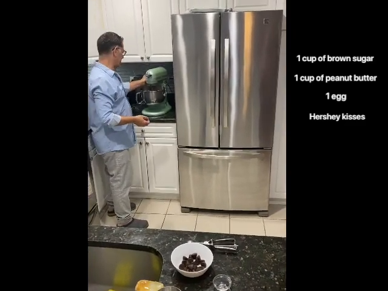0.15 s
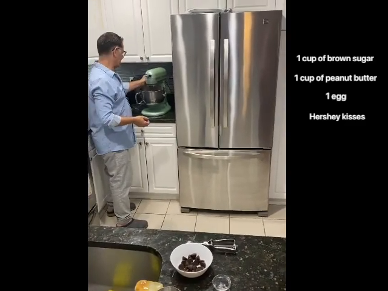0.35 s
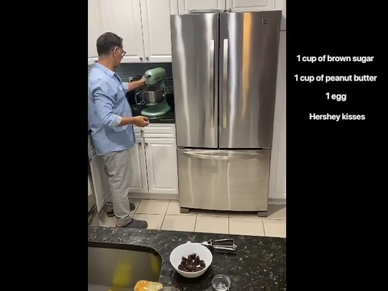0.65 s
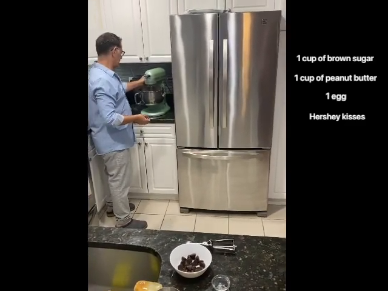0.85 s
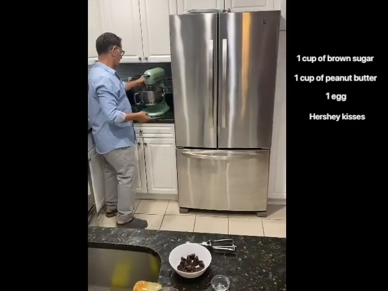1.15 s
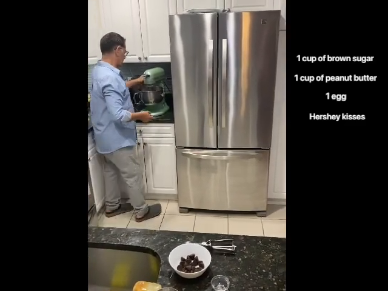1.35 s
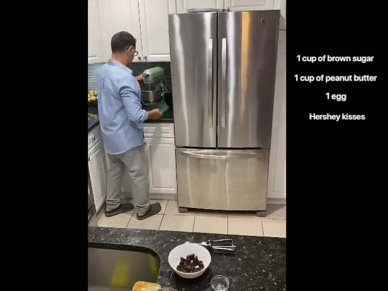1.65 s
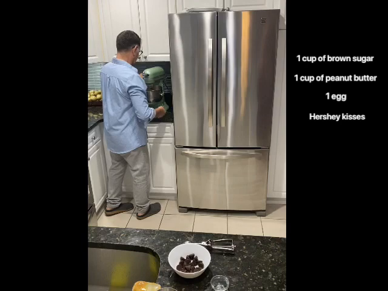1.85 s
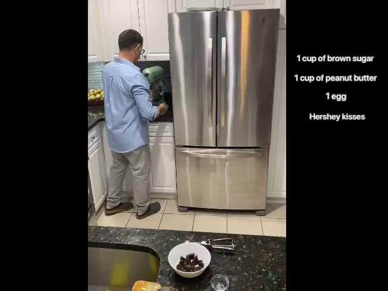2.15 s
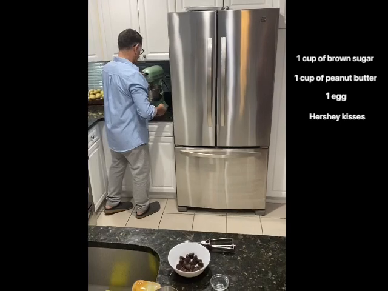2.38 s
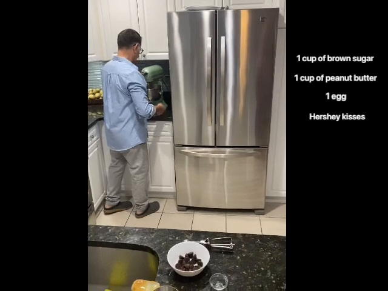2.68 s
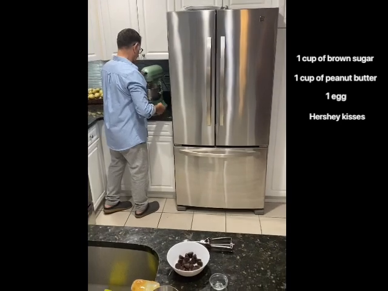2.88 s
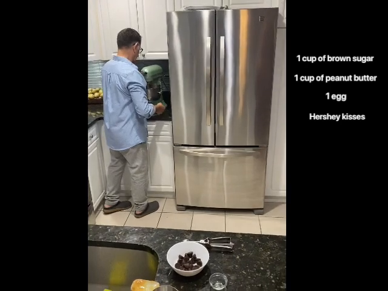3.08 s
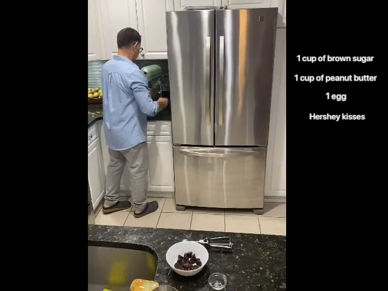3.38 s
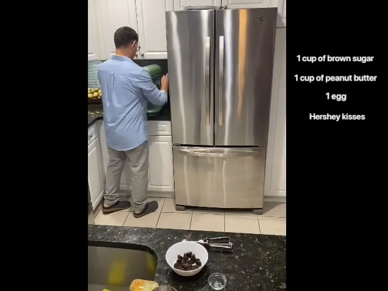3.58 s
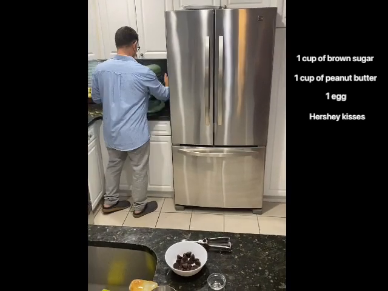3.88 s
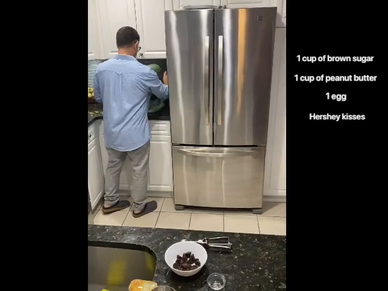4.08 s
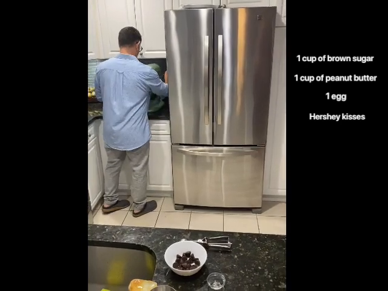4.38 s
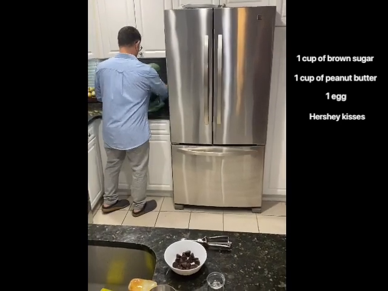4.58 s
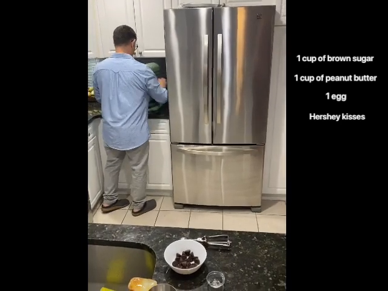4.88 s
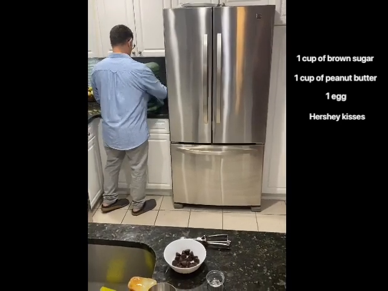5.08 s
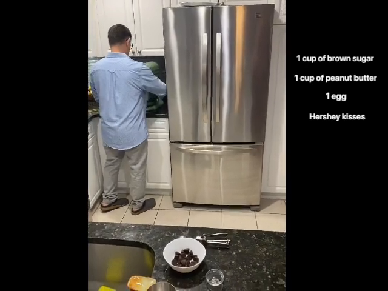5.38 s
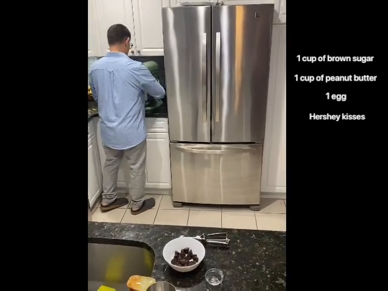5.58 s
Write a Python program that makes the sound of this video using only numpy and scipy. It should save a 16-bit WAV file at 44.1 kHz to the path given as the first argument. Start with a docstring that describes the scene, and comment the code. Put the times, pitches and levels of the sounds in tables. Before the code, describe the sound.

A stand mixer whines through thick dough, clicks off and winds down, then its head and steel bowl clank.

```python
"""A gear whine over hissing brushes and churning dough: a stand mixer at work in a tiled kitchen.
The speed lever snaps off; drag and friction slow the motor, and the slack gears glide down
through the resonances of the housing. Then the head and the steel bowl are handled: dull thumps,
clanks, rubbing and a short squeak. Two microphone ports hear it from a few metres away."""
import sys
import numpy as np
from scipy import signal
from scipy.fft import rfft, irfft, next_fast_len
from scipy.io import wavfile
from scipy.ndimage import map_coordinates

SR = 44100
rng = np.random.default_rng(int(sys.argv[2]) if len(sys.argv) > 2 else 0)


def digitize_waveform(pressure):
    """Quantize a signal to 16-bit integers and store it at the path in sys.argv[1].

    Rows of a 2-D input are taken as channels; values are limited to [-1, 1].
    """
    field = np.atleast_2d(pressure).T
    bounded = np.clip(field, -1, 1)
    quanta = np.round(bounded * 32767).astype(np.int16)
    wavfile.write(sys.argv[1], SR, quanta)


N = 252693
TIME = np.arange(N) / SR
SPLIT = np.array([[.5], [-.5]])  # shares a left-minus-right difference between the ports
MESH_HZ = 2375  # pitch of the meshing teeth at full speed


def mixer():
    """The motor's speed pulls the gear pitches along; hiss, churning and tones fade as it slows."""
    speed = motor_speed()
    travel = 2 * np.pi * np.cumsum(speed) / SR  # phase of a tone that is 1 Hz at full speed
    mesh_phase = MESH_HZ * travel
    slack = np.clip((.99 - speed) / .12, 0, 1)  # without power the teeth run slack
    stall_fade = np.clip(speed * MESH_HZ / 535, 0, 1) ** 1.45  # dies fast below a 535 Hz mesh pitch
    bed = brushes(speed, mesh_phase) + dough(speed) + running_tones(speed, slack)
    whine, whine_level = gear_whine(travel, slack)
    rattle, slack_level = slack_gears(speed, slack, mesh_phase)
    echo_send = (slack_level + amp(-18) * whine_level.mean(axis=0)) * np.sin(mesh_phase)
    echo = kitchen(echo_send, direct_db=-5.5)[:, :N]
    singing = kitchen(amp(-33) * housing(rattle), direct_db=3)[:, :N]
    return stall_fade * bed + whine + echo + singing


def motor_speed(off_s=3.239, drag_s=.8, friction_hz_per_s=1100):
    """Share of full speed: it settles, wavers in the dough, then drag and friction bring it to rest."""
    powered = 1 - .014 * np.exp(-TIME / .13) + 0.00266 * wobble(22)
    friction = friction_hz_per_s * drag_s / MESH_HZ
    coasting = (1 + friction) * np.exp(-np.maximum(TIME - off_s, 0) / drag_s) - friction
    return powered * np.maximum(coasting, 0)


# fader ride on the whine, shaded as the cook steps in front: t/s, level/dB, left minus right/dB
WHINE_RIDE = [(0.0, -31.5, -3.5), (0.04, -20.5, 1), (0.8, -21.5, 1), (0.9, -22, 1), (1.22, -21.5, 2),
              (1.28, -19.5, 1.5), (1.4, -21.5, 4), (1.55, -24.5, 2), (1.65, -28.5, 0), (1.7, -27.5, 0),
              (1.78, -26, 1), (1.92, -30.5, -3), (1.97, -26, -1), (2.07, -29.5, 1), (2.16, -31, 5),
              (2.28, -25, -7), (2.41, -31.5, -2.5), (2.5, -29.5, -11), (2.54, -20, 3), (2.63, -24.5, -9),
              (2.68, -28, -7), (2.84, -21.5, -1), (2.91, -30.5, -5), (3.03, -24, -2.5), (3.13, -28.5, -7),
              (3.22, -30, -2)]
# brief dips, often deeper at one port: t/s, left depth/dB, right depth/dB, half length/s
WHINE_DIPS = [(0.115, 20, 14, 0.012), (0.22, 0.5, 9, 0.0075), (0.301, 2, 1.5, 0.011),
              (.385, 1, 2.5, 0.0083), (0.483, 5, 21, 0.0057), (0.531, 12, 12.5, 0.015),
              (0.646, 7.5, 8.5, 0.014), (0.696, 8.5, 9, 0.01), (0.913, -1, 1.5, 0.018),
              (1.03, 14, 10, 0.016), (1.146, 0.5, 3, 0.0059), (1.45, -1, 3.5, 0.0071),
              (1.648, -3, 6.5, 0.018), (1.843, 9, 16, 0.0076), (1.916, 14, 6, 0.0072),
              (2.087, 20, 4, 0.0086), (2.156, -3, 11, .014), (2.356, 20, 3, .011), (2.674, 7, 2, .016),
              (2.89, 3, 1.5, 0.011), (2.95, 7, 8, 0.0093), (3.09, 7, 2.5, 0.014)]
# tremolo from the turning beater and shafts: f/Hz at full speed, depth/dB
SHAFT_TREMOLO = [(9.9, 0.35), (19.8, 1.0), (39.5, 0.84)]


def gear_whine(travel, slack, left_lead_rad=1.74, slip_rad_per_db=0.2):
    """Meshing teeth sing one tone that flutters with the load; returns the tone and its envelope."""
    ride_db, shadow_db = curves(WHINE_RIDE)
    tremolo_db = sum(depth * np.sin(hz * travel + 2 * np.pi * rng.random())
                     for hz, depth in SHAFT_TREMOLO)
    flutter_db = 1.15 * (wobble(60) + np.array([wobble(35), wobble(35.16)]))
    waver_rad = 0.27 * (wobble(30.22) + .5 * np.array([wobble(40.23), wobble(40)]))
    dip_db = sum(np.outer([left_db, right_db], np.exp(-((TIME - s) / half_length) ** 2))
                 for s, left_db, right_db, half_length in WHINE_DIPS)
    envelope = (1 - slack) * amp(ride_db - dip_db - 0.43)
    phase = MESH_HZ * travel + SPLIT * left_lead_rad + waver_rad - slip_rad_per_db * dip_db
    return envelope * amp(tremolo_db + flutter_db + SPLIT * shadow_db) * np.sin(phase), envelope


# bright hiss of brushes and fan: f/Hz, level/dB
BRUSH_COLOUR = [(1200, -14), (1900, -13.5), (2500, -1), (3100, -3.5), (3800, -5.5), (4500, -0.5), (5800, 0),
                (6400, -3.5), (7100, -5), (7800, -7), (10000, -6.5), (11000, -7.5), (11900, -110)]


def brushes(speed, mesh_phase, teeth=20):
    """The brushes hiss unevenly and scrape harder once a turn."""
    scrape = (1 + 0.067 * np.sin(mesh_phase / teeth)) * amp(1.06 * wobble(22.25))
    return amp(-32.5) * speed * scrape * noise(BRUSH_COLOUR)


# midrange churn of thick dough: f/Hz, level/dB
DOUGH_COLOUR = [(100, -13.5), (180, -7.5), (260, -1), (430, 3), (550, -6), (680, 7), (780, -1), (870, 7),
                (980, -3.5), (1200, 5), (1700, -5.5), (2300, 3), (4000, -17.5), (11000, -29), (12000, -110)]


def dough(speed, sag_db_per_s=1.06):
    """The beater drags through the dough; the churning eases as it softens."""
    level_db = -39 - sag_db_per_s * TIME + 1.86 * wobble(24.6)
    return amp(level_db) * speed ** 0.65 * noise(DOUGH_COLOUR)


# low partials of the gear train at full speed: f/Hz, level/dB
GEAR_PARTIALS = [(306.5, -51.5), (360.5, -55), (419.5, -58), (452, -63), (651.4, -49), (710, -63),
                 (834, -57), (872.1, -54), (920, -62.5), (1071, -50.5), (1168, -57.5), (1206, -49.5),
                 (1233, -48), (1427, -50), (1464, -55.5), (1545, -57.5), (1900, -71), (2137, -61.5)]
# high partials of the armature at full speed: f/Hz, level/dB
ARMATURE_PARTIALS = [(2612, -64), (2681, -66), (2849, -49.5), (2972, -59), (3086, -53.5), (3293, -54),
                     (3437, -57.5), (3560, -55), (4037, -52.5), (4165, -54), (4276, -50), (4512, -53.5),
                     (4710, -54), (4985, -45), (5342, -51), (5463, -49.5), (5582, -53), (5698, -53),
                     (5952, -47.5), (6070, -46), (6644, -56), (6998, -59.5), (7117, -49), (8545, -54)]
# the whine's octave swells as the cook turns: t/s, level/dB
OCTAVE_RIDE = [(0, -55), (.35, -39), (1.2, -49), (1.7, -43), (2.0, -32), (2.3, -45.5), (2.55, -33),
               (2.75, -41), (3.2, -40.5)]


def running_tones(speed, slack):
    """Gear train, armature and the whine's octave hum under load and sink away as the teeth go slack."""
    octave_db, = curves(OCTAVE_RIDE)
    gears = tones(GEAR_PARTIALS, speed, smear=0.57, waver_hz=14)
    armature = amp(3) * tones(ARMATURE_PARTIALS, speed, smear=1.94, waver_hz=30)
    octave = amp(octave_db) * tones([(2 * MESH_HZ, 0)], speed, smear=1.0, waver_hz=59)
    return amp(-16 * slack) * speed * (gears + armature + octave)


# falling tones of the slack gears: multiple of the mesh pitch, level/dB
SLACK_PARTIALS = [(.465, -1), (.53, -2), (.6, -9.5), (.96, -1), (1.2, -16.5), (1.45, -11)]
# dark chatter of loose teeth: f/Hz, level/dB
CHATTER_COLOUR = [(300, 5.5), (660, -2), (900, -17), (2500, -21), (5000, -40)]


def slack_gears(speed, slack, mesh_phase, grip_hz=343, fade_range_hz=131):
    """Loose teeth strike unevenly until they grip; returns their rattle and the mesh tone's envelope."""
    loose = slack * np.clip((speed * MESH_HZ - grip_hz) / fade_range_hz, 0, 1)
    glides = sum(amp(db + 3 * wobble(70)) * np.sin(multiple * mesh_phase)
                 for multiple, db in SLACK_PARTIALS)
    chatter = amp(1.5) * np.sqrt(speed) * unit(equalised(rng.standard_normal(N), CHATTER_COLOUR))
    return loose * (glides + chatter), amp(-48.5) * speed ** 1.4 * loose


# resonances of the cast housing: f/Hz, width/Hz, level/dB
HOUSING_MODES = [(402, 30, -9), (653.3, 34, 4), (856, 44, -1), (1073, 70, -9.5), (1194, 60, -8),
                 (1470, 190, -4.5), (2130, 240, -0.5)]


def housing(drive):
    """The housing sings whenever a falling gear tone crosses one of its steep-sided resonances."""
    def response(f):
        return sum(amp(db) * (1j * f * width / (hz * hz - f * f + 1j * f * width)) ** 2
                   for hz, width, db in HOUSING_MODES)
    return filtered(drive, response)


# cues for the speed lever: t/s, level/dB, knock/dB, clang/dB, bite/dB
SWITCH_HITS = [(3.2105, -13, -19, -22, -3.5), (3.2145, -10, -16, -21.5, -1)]
# its short, bright ring: f/Hz, level/dB, t60/s
SWITCH_MODES = [(3287, -1, 0.055), (4400, 4.5, 0.036), (5840, -12.5, 0.021)]


def speed_lever():
    """The lever snaps to off with a tight double click."""
    return contacts(SWITCH_HITS, SWITCH_MODES, ring_db=-11.5, crack_db=18.5, body_db=-2,
                    rattle_s=0.021, direct_db=5, top_hz=11300)


# cues for the head: t/s, level/dB, knock/dB, clang/dB, bite/dB
HEAD_HITS = [(4.364, -24.5, -8, -8.5, 6), (4.3829, -28.5, 0.5, -0.5, -2), (4.6149, -10, -11, -9, -1),
             (4.6187, -10.5, -17.5, -5.5, -6.5), (4.6507, -29, 9.5, -27, 1), (4.7076, -33.5, 1.5, 5.5, -5),
             (5.5689, -20.5, -10.5, -13, -9.5), (5.5851, -32.5, 4, -9, -3.5), (5.619, -39.5, 5.5, 1, -10),
             (5.7214, -39.5, -11, -19, 7)]
# its full-bodied ring: f/Hz, level/dB, t60/s
HEAD_MODES = [(150, -14.5, 0.2503), (435, -4, 0.27), (490, -9, 0.15), (645.8, -1, 0.31), (860, -0.5, 0.12),
              (1018, -1.5, 0.17), (1111, 5.5, 0.14), (1540, -1.5, 0.13), (1850, -28, 0.16),
              (2360, 4.5, 0.051), (2610, 7.5, 0.054), (4120, 1.5, 0.08), (4730, -9.5, 0.052),
              (5800, -15.5, 0.066), (5950, -5.5, 0.065)]


def mixer_head():
    """The heavy head knocks against its stops."""
    return contacts(HEAD_HITS, HEAD_MODES, ring_db=-12.5, crack_db=14, body_db=6.5,
                    rattle_s=0.055, direct_db=2.5, top_hz=14000)


# cues for the bowl: t/s, level/dB, knock/dB, clang/dB, bite/dB
BOWL_HITS = [(5.1896, -16, -26, -10.5, -2.5), (5.1964, -22, -6, -6.5, 0), (5.2234, -34, -1, -0.5, -5),
             (5.3622, -44.5, -14, 0, 12.5)]
# its short steel ring: f/Hz, level/dB, t60/s
BOWL_MODES = [(777, 13.5, 0.049), (851, 11.5, 0.087), (950, 4, 0.033), (1233, 2, 0.12), (1487, 8, 0.12),
              (3520, -13, 0.054), (4630, -8, 0.071), (5730, -17, 0.085), (8260, -21, 0.22)]


def steel_bowl():
    """The beater clanks against the bowl."""
    return contacts(BOWL_HITS, BOWL_MODES, ring_db=-5, crack_db=17, body_db=-10,
                    rattle_s=0.045, direct_db=5, top_hz=11900)


# cues for the lock: t/s, level/dB, knock/dB, clang/dB, bite/dB
LOCK_HITS = [(4.4047, -18.5, 0, -17, 0), (4.4121, -16, -6, -21, 4.5)]
# its crisp ring: f/Hz, level/dB, t60/s
LOCK_MODES = [(433, -12, .13), (2390, 4.5, 0.037), (2630, 2, 0.035), (2970, 0, 0.052), (3270, 0.5, 0.046),
              (4250, 2, 0.082), (6090, -2, 0.094), (7640, -7, 0.1), (9000, -9, .05), (9900, -4.5, 0.054)]


def lock():
    """The lock snaps over in two quick contacts."""
    return contacts(LOCK_HITS, LOCK_MODES, ring_db=-11.5, crack_db=18, body_db=-7.5,
                    rattle_s=0.029, direct_db=6.5, top_hz=11100)


# cues for the levers: t/s, level/dB, knock/dB, clang/dB, bite/dB
LEVER_HITS = [(4.0205, -41.5, -11, 4, -7), (4.354, -35, -12, -8, 2), (4.9585, -31.5, -4, -3.5, -3),
              (5.0459, -42.5, 0, -3, -5)]
# their thin ring: f/Hz, level/dB, t60/s
LEVER_MODES = [(860, 0, 0.22), (1040, -5, 0.23), (1997, 1.5, 0.076), (2490, 5, 0.035), (4180, -4, .08),
               (5330, -6, .07)]


def lever_ticks():
    """The levers tick lightly as they are handled."""
    return contacts(LEVER_HITS, LEVER_MODES, ring_db=-10.5, crack_db=15, body_db=-11.5,
                    rattle_s=0.054, direct_db=2, top_hz=11300)


# noise of metal on metal, struck or rubbed: f/Hz, level/dB
CONTACT_COLOUR = [(40, -6), (150, -10), (200, -12), (260, -0.5), (340, -8), (430, 5.5), (600, -3.5),
                  (1100, 2.5), (1900, -6), (2600, -11.5), (4200, -6.5), (6000, -16), (8000, -19),
                  (10000, -21), (11500, -19), (12500, -30), (16000, -38)]


def contacts(hits, modes, ring_db, crack_db, body_db, rattle_s, direct_db, top_hz):
    """Each hit cracks for a moment and rings its part's modes at new strengths; the kitchen answers."""
    out, t = np.zeros((2, N)), np.arange(SR // 4) / SR
    for s, db, knock_db, clang_db, bite_db in hits:
        ring = np.zeros(len(t))
        for hz, mode_db, t60 in modes:
            struck_db = mode_db + rng.normal(0, 1.5)
            ring += amp(struck_db - 60 * t / t60) * np.sin(2 * np.pi * (hz * t + rng.random()))
        ring *= 1 - np.exp(-t / 0.00056)
        burst = rng.standard_normal(len(t)) * amp(-60 * t / rattle_s) * (1 - np.exp(-t / 0.0033))
        crack = filtered(burst, lambda hz: amp(along(CONTACT_COLOUR, hz)) * below(top_hz, hz))
        # a heavy part answers more strongly in its low range
        low_db, mid_db = knock_db + body_db, clang_db + body_db / 2
        eq = [(250, low_db), (550, low_db), (850, mid_db), (1500, mid_db),
              (2300, bite_db), (3200, bite_db), (5000, 0)]
        blow = equalised(amp(ring_db) * ring + amp(crack_db) * crack, eq)
        add(out, s, amp(db) * kitchen(blow, direct_db))
    return out


# soft bumps on the counter: t/s, level/dB, f/Hz
COUNTER_BUMPS = [(4.032, -33.5, 51.6), (4.08, -28.5, 56), (4.626, -29.5, 68.5), (4.634, -37.5, 133)]


def counter_thumps(attack_s=0.0079, t60=0.28):
    """The counter booms briefly under the machine's weight."""
    out, t = np.zeros(N), np.arange(SR // 2) / SR
    for s, db, hz in COUNTER_BUMPS:
        envelope = amp(db - 60 * t / t60) * (1 - np.exp(-t / attack_s))
        add(out, s, envelope * np.sin(2 * np.pi * hz * t))
    return out


# strokes of metal sliding on metal: t/s, length/s, level/dB
RUB_STROKES = [(4.3, 0.045, -56.5), (4.349, 0.015, -41.5), (4.51, 0.26, -44), (5.169, 0.031, -42),
               (5.347, 0.034, -47), (5.42, 0.04, -64.5), (5.63, 0.12, -53)]


def rubbing(attack_s=0.022, release_db_per_s=116, top_hz=10000):
    """Sliding metal rasps unevenly."""
    strokes = np.zeros(N)
    for s, length, db in RUB_STROKES:
        attack = np.clip((TIME - s) / attack_s, 0, 1)
        strokes += attack * amp(db - release_db_per_s * np.maximum(TIME - s - length, 0))
    grain = amp(1.5 * wobble(27.04))
    return strokes * grain * filtered(noise(CONTACT_COLOUR), lambda hz: below(top_hz, hz))


def squeak(start_s=4.558, length_s=0.07, pitch_hz=3660, scatter_hz=49.4):
    """Slipping metal squeaks at a wavering pitch, leading into the loudest clank."""
    swell = np.sin(np.pi * np.clip((TIME - start_s) / length_s, 0, 1))
    hz = pitch_hz + scatter_hz * wobble(400)
    return amp(-43.5) * swell * np.sin(2 * np.pi * np.cumsum(hz) / SR)


# low bed of room tone: f/Hz, level/dB
ROOM_COLOUR = [(20, -43), (40, -20), (60, 7.5), (80, 1), (110, -0.5), (150, -9), (200, -12.5), (430, -10),
               (900, -23.5), (1600, -42), (5000, -45), (11000, -65), (12500, -110)]


def room_tone():
    """The room rumbles faintly under everything."""
    return amp(-51.5) * noise(ROOM_COLOUR)


# reverb time of the tiled kitchen: f/Hz, t60/s
KITCHEN_DECAY = [(100, 0.23), (500, 0.51), (2000, 0.41), (5000, 0.36), (9000, 0.29), (12500, 0.049)]


def kitchen(sound, direct_db):
    """A mono sound reaches the ports directly, then as a tail that dies by frequency."""
    hz, t, bands = signal.stft(rng.standard_normal((2, SR // 2)), SR, nperseg=256)
    decay = amp(-60 * t / along(KITCHEN_DECAY, hz)[:, None])
    impulse = signal.istft(bands * decay, SR, nperseg=256)[1]
    impulse /= np.linalg.norm(impulse[0])
    impulse[0, 16] += amp(direct_db)
    path = ports(impulse)
    return signal.fftconvolve(sound[None], path / np.linalg.norm(path[0]), axes=1)


# how alike the two ports sound: f/Hz, coherence/0-1
PORT_COHERENCE = [(100, .999), (270, .97), (560, .85), (780, .6), (1300, .8), (1900, .92), (2800, .35),
                  (3900, .15), (4900, .55), (6000, .82), (7500, .62), (11000, .72)]
# phase between the ports: f/Hz, left lead/rad
PORT_LEAD = [(200, 0), (450, -.2), (700, -.9), (1900, .1), (2300, 1.7), (3600, 1.6), (4400, 3.1), (5100, 4),
             (5600, 6.8), (8000, 7.8), (10000, 8.5), (11000, 9.3)]
# pan by frequency: f/Hz, left minus right/dB
PORT_BALANCE = [(60, 0.5), (110, 1), (190, 2.5), (340, 3), (610, 5), (1080, 1.0), (1930, -0.5), (3440, -2),
                (6120, 0), (10900, -0.5)]


def ports(pair):
    """Two unrelated signals become what the ports hear: alike in the bass, wider in the treble."""
    def width(hz):
        angle = np.arccos(np.clip(along(PORT_COHERENCE, hz), -1, 1)) / 2
        return np.array([np.cos(angle), np.sin(angle)])

    def pan(hz):
        return amp(SPLIT * along(PORT_BALANCE, hz)) * np.exp(1j * SPLIT * along(PORT_LEAD, hz))
    mid, side = filtered(pair, width)
    return filtered(np.array([mid + side, mid - side]), pan)


def tones(partials, speed, smear, waver_hz):
    """Partials that follow the speed; play in the parts makes each waver in strength and phase."""
    knots, cycles = np.arange(N) * waver_hz / SR, np.cumsum(speed) / SR
    knot, between = knots.astype(int), knots % 1
    out = np.zeros((2, N))
    for hz, db in partials:
        waver = smear * rng.standard_normal((2, 2, 512))  # signal, quadrature part, knot
        waver[:, 0] += 1  # the steady core of the tone
        sway = amp(db) * waver / np.sqrt(.5 + smear ** 2)
        sway = sway.take(knot, axis=2) + between * np.diff(sway).take(knot, axis=2)
        phase = 2 * np.pi * hz * cycles
        out[0] += sway[0, 0] * np.cos(phase) + sway[0, 1] * np.sin(phase)
        out[1] += sway[1, 0] * np.sin(phase) + sway[1, 1] * np.cos(phase)
    return ports(out)


def noise(colour):
    """Stereo noise of rms 1 with the given colour."""
    return unit(ports(equalised(rng.standard_normal((2, N)), colour)))


def equalised(x, eq):
    """x through an EQ curve of (f/Hz, level/dB) points."""
    return filtered(x, lambda hz: amp(along(eq, hz)))


def filtered(x, response):
    """x through a complex frequency response."""
    n = x.shape[-1]
    padded = next_fast_len(n + 8192)
    return irfft(rfft(x, padded) * response(np.fft.rfftfreq(padded, 1 / SR)), padded)[..., :n]


def below(top_hz, hz):
    """Gain of a steep low-pass."""
    return 1 / (1 + (hz / top_hz) ** 30)


def along(points, hz):
    """Read (f/Hz, value) points on a log frequency axis."""
    f, values = np.transpose(points)
    return np.interp(np.log(hz + 1), np.log(f + 1), values)


def curves(rows):
    """One automation curve for each column after the time."""
    s, *columns = np.transpose(rows)
    return [np.interp(TIME, s, column) for column in columns]


def wobble(rate):
    """A smooth random curve, rate knots a second."""
    return map_coordinates(rng.standard_normal(int(N * rate / SR) + 4), [TIME * rate], order=2)


def add(track, s, sound):
    """Mix a sound into a track at s seconds."""
    part = track[..., round(s * SR):][..., :sound.shape[-1]]
    part += sound[..., :part.shape[-1]]


def amp(db):
    """Decibels to gain."""
    return 10 ** (np.asarray(db) / 20)


def unit(x):
    """x at rms 1."""
    return x / np.sqrt(np.mean(x ** 2) + 1e-20)


def scene():
    """Mixer and handling over the low rumble of the room."""
    hits = speed_lever() + lock() + lever_ticks() + mixer_head() + steel_bowl()
    return mixer() + hits + counter_thumps() + rubbing() + squeak() + room_tone()


def record(dry):
    """A brick-wall low-pass takes off the top air."""
    return filtered(dry, lambda hz: hz < 15900)


dry = scene()
out = record(dry)
digitize_waveform(out)
```